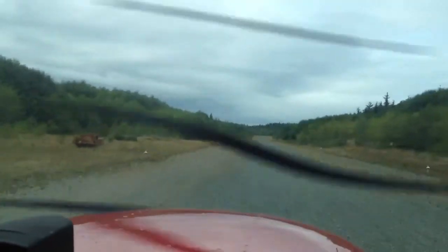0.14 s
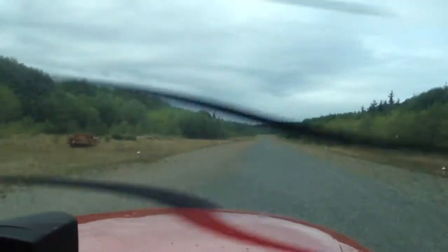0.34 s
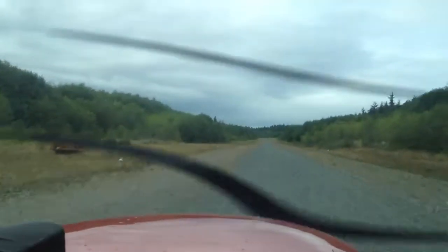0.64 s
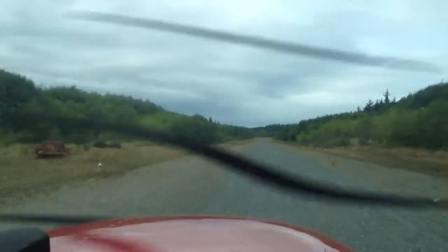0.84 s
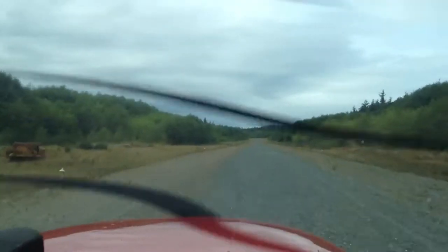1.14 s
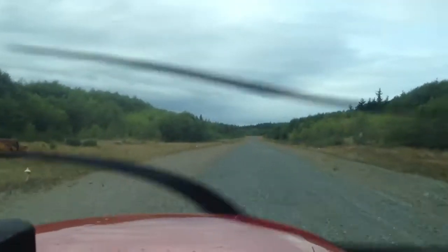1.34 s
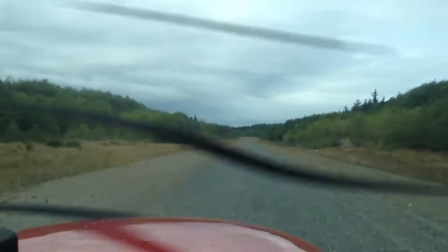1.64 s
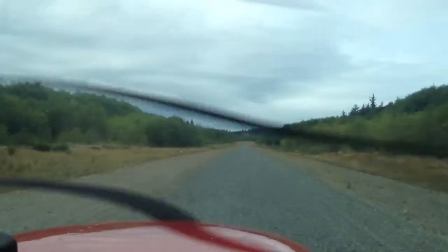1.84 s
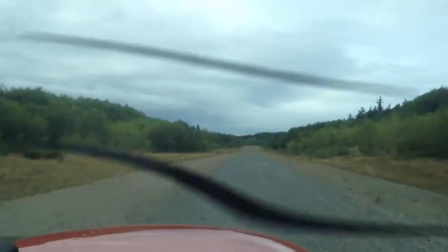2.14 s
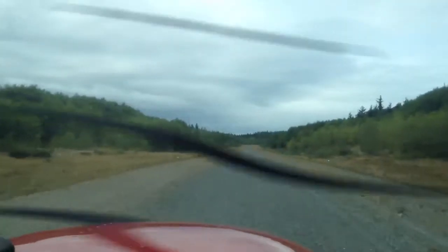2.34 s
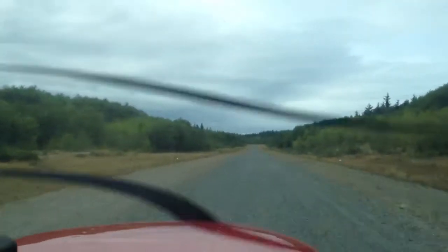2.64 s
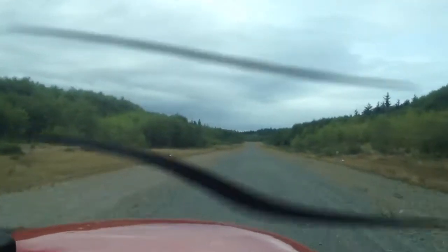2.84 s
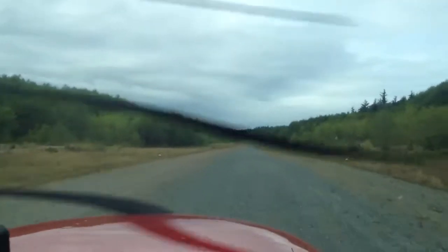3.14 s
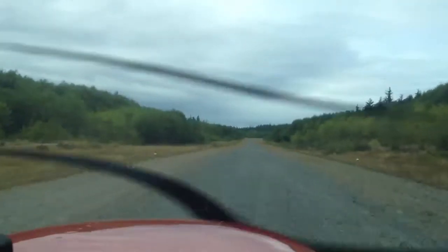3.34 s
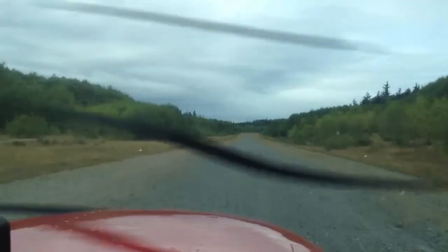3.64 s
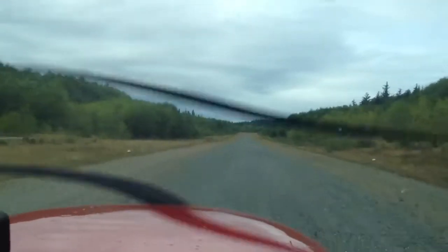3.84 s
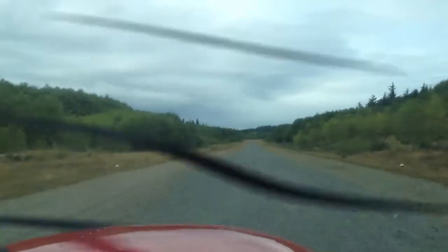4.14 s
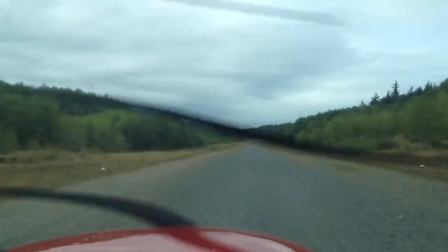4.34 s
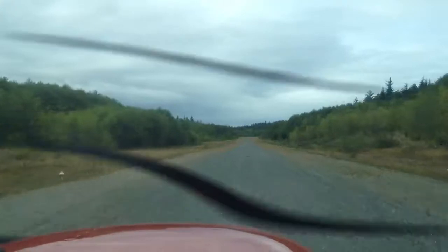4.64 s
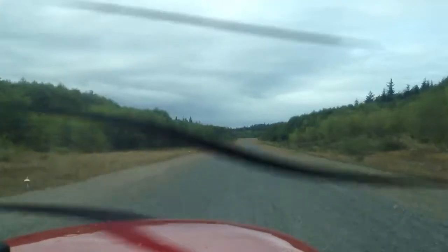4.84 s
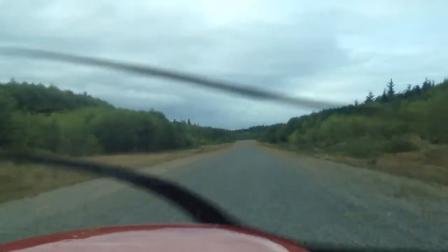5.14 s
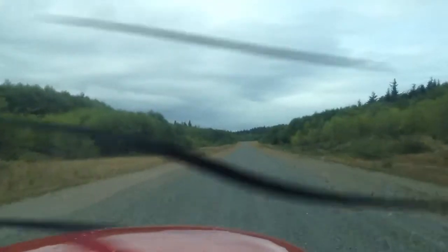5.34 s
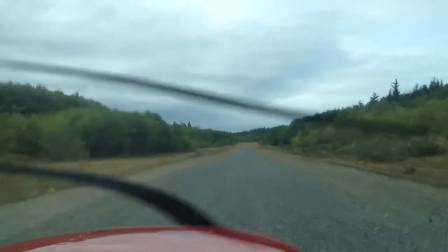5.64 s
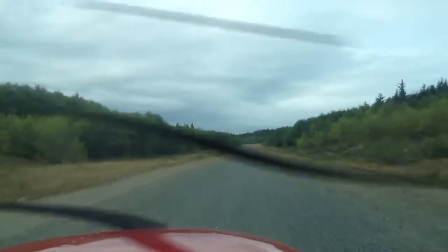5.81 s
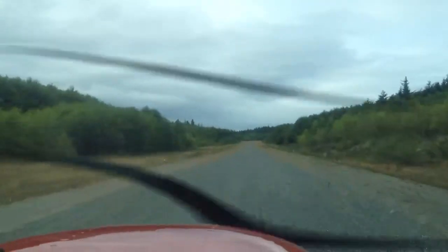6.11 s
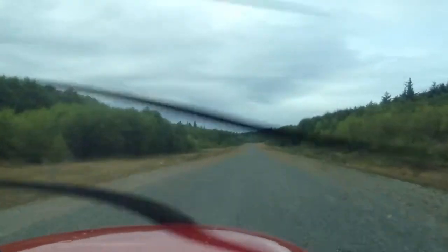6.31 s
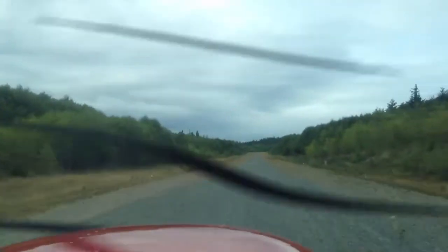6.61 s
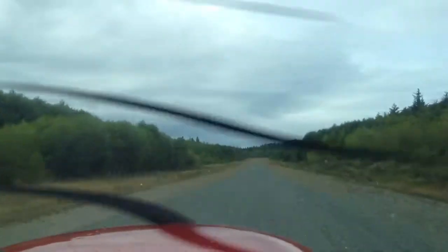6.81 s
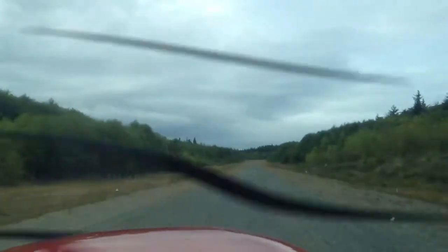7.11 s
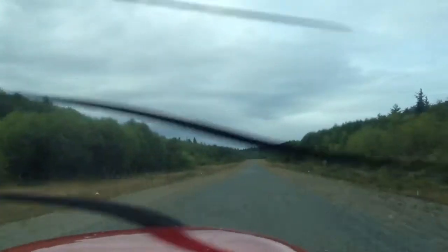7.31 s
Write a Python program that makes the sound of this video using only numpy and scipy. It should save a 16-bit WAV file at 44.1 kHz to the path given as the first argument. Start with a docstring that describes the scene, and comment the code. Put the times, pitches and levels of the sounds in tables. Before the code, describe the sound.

From a microphone in the cabin of a light aircraft, a fast crackling rattle of propeller blades bounces around the small space. It blunts into a hollow puttering and gives way to a fuller exhaust drone, with booming cabin rumble, rushing air and a faint hiss. The engine speed stays even as the plane rolls along the strip, and a few small, bright ticks come late on.

```python
"""Sharp propeller slaps, one a turn, bounce around the cabin of a light piston aircraft.
It is starting its takeoff roll at a steady engine speed. As the blades bite the air, the slaps
soften into a hollow putter. The exhaust drones, the cabin booms, and the air thrown back by the
propeller (the wash) roars on the windscreen and hisses at the seals. Near the end a loose fitting ticks."""
import sys
import numpy as np
from scipy import signal
from scipy.fft import rfft, irfft, next_fast_len
from scipy.io import wavfile
from scipy.ndimage import uniform_filter1d, minimum_filter1d

SR = 44100
rng = np.random.default_rng(int(sys.argv[2]) if len(sys.argv) > 2 else 0)


def to_wav(s):
    """Save 16-bit WAV."""
    ch = np.atleast_2d(s).T  # columns
    pcm = np.round(np.clip(ch, -1, 1) * 32767)  # PCM
    wavfile.write(sys.argv[1], SR, pcm.astype(np.int16))


N = 329427
TIME = np.arange(N) / SR

# How fast the propeller shaft spins: time_s, speed_hz (turns a second)
SHAFT_SPEED = [(0, 40.63), (2, 40.67), (3.5, 40.77), (5.3, 40.8), (6.4, 40.9), (7.47, 40.9)]
# The slap's shape and timing; a longer wave sounds blunter: time_s, half_length_s, late_s, jitter_s
SLAP_WAVE = [(0, 0.00023, 0.00026, 0.00039), (.4, 0.00022, 0.00025, 0.0004), (.55, 0.00028, .0008, 0.00018),
             (1.2, 0.00026, 0.00076, 0.00018), (1.6, 0.00032, .0002, 0.00022),
             (2.1, 0.00034, -0.0011, 0.00022), (2.8, 0.00053, 0.0032, 0.00046)]


def undb(db):
    """Turn decibels into a number to multiply by."""
    return 10 ** (np.asarray(db) / 20)


def curve(table, at=TIME):
    """Join a table's rows with straight lines in time; one curve for each column after the first."""
    times, *columns = np.transpose(table)
    return [np.interp(at, times, column) for column in columns]


def unit(x):
    """Scale a sound to a standard strength (rms 1)."""
    return x / np.std(x)


def colour(x, spectrum):
    """Shape a sound's bass and treble with (pitch_hz, level_db) points, then scale it to rms 1."""
    hz, db = np.transpose(spectrum)
    size = next_fast_len(N + SR // 10)
    bins_hz = np.fft.rfftfreq(size, 1 / SR) + 1
    gain = undb(np.interp(np.log(bins_hz), np.log(hz), db))
    return unit(irfft(rfft(x, size) * gain, size)[:N])


def ring(x, hz, width_hz):
    """Let a sound ring at one pitch; a narrower width rings for longer."""
    return signal.lfilter(*signal.iirpeak(hz, hz / width_hz, fs=SR), x)


def wander(rate_hz):
    """A smooth random wobble, about 1 in size, that heads for a new value rate_hz times a second."""
    step = int(SR / rate_hz)
    held = np.repeat(rng.standard_normal(N // step + 2), step)[rng.integers(step):]
    return 1.34 * uniform_filter1d(uniform_filter1d(held, step), step)[:N]


def noise():
    """White noise: all pitches equally strong."""
    return rng.standard_normal(N)


def seal_hiss(gusts, wash_db):
    """Air hisses at the cabin seals, louder as the thrust builds."""
    # The tone of the hiss: pitch_hz, level_db
    tone = [(2000, -2.5), (3600, 4), (4400, -4), (5500, 1.5), (7200, 2.5), (8600, 4), (9700, 0.5),
            (11500, 0), (14000, -3.5), (15500, -10)]
    # How the hiss rises and falls: time_s, level_db
    levels = [(0, -4), (.5, -2), (1.2, -2), (2.1, 1.5), (3, -1), (7.47, 0.1)]
    hiss = colour(noise(), tone) * (1 + 0.29 * (gusts - 1)) * undb(0.87 * wander(30))
    return hiss * undb(-37 + 0.83 * wash_db + curve(levels)[0])


def cabin_boom(wash_db, lurch_db=0.84, boom_hz=172, width_hz=42):
    """The wash and the wheels shake the cabin air in lurches, most of all at its own natural pitch."""
    # The tone of the low rumble: pitch_hz, level_db
    tone = [(25, -19), (45, -14), (66, -51), (80, -26), (102, -5.5), (140, -5), (180, 2.5), (200, 3),
            (228, -5.5), (330, -7), (480, -20.5), (1000, -47)]
    # The rumble builds as the roll starts and eases as the wings take the weight: time_s, level_db
    levels = [(0, -10.5), (1.2, -2.5), (1.7, -0.5), (2.15, -2.5), (2.5, 0), (3.2, -0.5), (4, -1.5),
              (5.7, 2.5), (6.8, -1.5), (7.47, -1.5)]
    boom = unit(ring(ring(noise(), boom_hz, width_hz), boom_hz, width_hz))
    rumble = colour(noise(), tone) * undb(curve(levels)[0] + lurch_db * wander(6.4))
    return rumble * undb(-19 + 0.77 * wash_db) + boom * undb(-23 + 1.08 * wash_db)


def engine_clatter(turn, low_cut_hz=750):
    """The engine repeats the same rough clatter every two turns, pitched above most of the drone."""
    cycle = rng.standard_normal(2048)
    places = np.arange(len(cycle)) / len(cycle)
    clatter = unit(np.interp(turn / 2, places, cycle, period=1))
    return signal.sosfilt(signal.butter(4, low_cut_hz, "high", fs=SR, output="sos"), clatter)


def wind_roar(turn, gusts, clatter_db=-9, flutter_db=1.0):
    """The wash roars on the windscreen; mixed with engine clatter, it makes windows and trim ring."""
    # The tone of the roar: pitch_hz, level_db
    tone = [(200, -13), (420, 1.5), (490, 1.5), (630, -2), (740, -5.5), (940, -5.5), (1060, -11),
            (1330, -11), (1460, -15), (1800, -16), (2450, -23), (3200, -26), (4200, -46), (8000, -85)]
    # The narrow rings of windows and trim: pitch_hz, width_hz, level_db
    trim_rings = [(645, 30, -8), (1341, 30, -4.5), (1535, 27, -3.5), (1676, 43, -8), (1788, 50, -3.5),
                  (2020, 22, -14), (2165, 32, -2), (2772, 17, 4), (3160, 53, -2), (3440, 65, 3),
                  (3680, 45, -1)]
    # The roar builds with the thrust, then holds: time_s, level_db
    levels = [(0, -25.5), (1.4, -24), (1.7, -21), (2.15, -20.5), (2.36, -17.6), (2.65, -19.4),
              (2.82, -18.6), (3, -20), (3.5, -17.5), (3.65, -20), (4.25, -20.5), (4.48, -17.2),
              (4.66, -17.8), (4.8, -19.8), (5.25, -21.3), (5.5, -20), (5.85, -18.5), (6.2, -18.5),
              (6.9, -20), (7.47, -18)]
    clatter = undb(clatter_db) * engine_clatter(turn)
    rush = (noise() + clatter) * gusts * undb(flutter_db * wander(60))
    trim = sum(undb(db) * ring(rush, hz, width_hz) for hz, width_hz, db in trim_rings)
    return colour(rush + trim, tone) * undb(curve(levels)[0])


def fitting_ticks(rise_s=0.0007, chatter_db=2.5):
    """A loose fitting strikes sharply and chatters for a few thousandths of a second."""
    # Each strike of the fitting: start_s, level_db, decay_s
    strikes = [(6.188, -26, .005), (6.310, -29, .006), (6.369, -24.5, .008), (6.552, -25.5, .006),
               (7.040, -22, 0.0063)]
    # The bright tone of a tick: pitch_hz, level_db
    tone = [(3000, -20), (6000, -7), (11500, -3), (15500, -13)]
    envelope = 0
    for start_s, db, decay_s in strikes:
        age = np.maximum(TIME - start_s, 0)
        envelope += undb(db) * (1 - np.exp(-age / rise_s)) * np.exp(-age / decay_s)
    return envelope * colour(noise() * undb(chatter_db * wander(2500)), tone)


def engine_drone(turn, waver_db=1.8, wobble=0.032):
    """Exhaust and blade tones follow the shaft; uneven firing shakes each one, the lowest least."""
    # The tones that make up the drone: shaft_multiple (of the shaft speed), level_db
    tones = [(2, -16), (3, -12.5), (4, -6.5), (5, -16.5), (6, -8.5), (7, -17.5), (7.5, -14), (8, -14),
             (8.5, -17.5), (9, -19), (10, -26), (10.5, -14.5), (11, -15.5), (12, -19), (12.5, -19.5),
             (13, -14.5), (14, -19), (15, -17), (15.5, -18.5), (21, -24)]
    # The drone firms up as the aircraft gathers speed: time_s, level_db
    levels = [(0, -32.5), (1.3, -37), (2, -25), (2.7, -17), (3.6, -19.5), (4.5, -14.5), (5.2, -17),
              (5.8, -18), (6.3, -18), (6.9, -17.5), (7.47, -17)]
    # Tones that sing out for a while: shaft_multiple, peak_s, spread_s, level_db
    swells = [(4, .65, 0.23, -31.5), (6, 2.3, 0.7, -28), (12, 2.05, .2, -31), (4, 1.85, 0.17, -31),
              (6, 1.96, 0.24, -32), (10, 2.7, 0.31, -25), (10, 4.1, 0.86, -28.5), (3, 4.03, 1.46, -25),
              (8, 3.26, 0.17, -27.5), (12, 3.6, 0.22, -30), (7.5, 4.72, 0.22, -26), (14, 5.2, 0.45, -27),
              (13, 6.4, 0.44, -26.5), (11, 5.78, 0.39, -27.5), (6, 5.6, .6, -28), (15, 6.01, 0.27, -25.5),
              (15, 6.94, 0.41, -29), (4, 6.67, 0.3, -19.5), (2, 6.9, 1.2, -31), (8, 7.5, 1.05, -23.5),
              (6, 7.55, 0.3, -21.5), (10.5, 7.4, 0.47, -25)]
    drone_db, = curve(levels)
    drone = 0
    for multiple, db in tones:
        swell = sum(undb(peak_db) * np.exp(-((TIME - peak_s) / spread_s) ** 2 / 2)
                    for which, peak_s, spread_s, peak_db in swells if which == multiple)
        shake = min(multiple / 4, 1) ** 2
        phase = 2 * np.pi * (multiple * turn + rng.random()) + multiple * wobble * wander(12)
        size = np.hypot(undb(drone_db + db), swell) * undb(shake * waver_db * wander(5))
        drone += size * np.sqrt(2) * np.sin(phase)
    return drone


def lull_db(at):
    """Slack air lets slap and putter fall away briefly; gives the change in dB at each time."""
    # Short dips, and one small lift: middle_s, length_s, change_db
    lulls = [(.056, .025, -3), (.585, .05, -7), (1.225, .05, -2), (1.311, .025, -21), (1.46, .025, -17),
             (1.545, .05, -2), (1.853, .025, 2.5), (2.05, .025, -14)]
    return sum(db * (np.abs(at - middle_s) < length_s / 2) for middle_s, length_s, db in lulls)


def hollow_putter(turn, shaft_hz, rise_s=0.0018, decay_s=0.0067, uneven_db=2.4, detune=0.018,
                  upper_hz=890, upper_peak_s=0.0026, middle_hz=660, middle_db=-13, deep_hz=250):
    """Each blunt slap thumps four hollow rings out of the cabin; the upper one swells and soon stops."""
    # The putter, with two rings set against its main one: time_s, level_db, pitch_hz, upper_db, deep_db
    thumps = [(0, -32, 462, -8, -16), (.6, -31.8, 476, 1.5, -11), (1.3, -28.5, 483, 3, -9),
              (1.52, -22.8, 466, -5, -5), (1.83, -22, 458, -10, -5.5), (2.15, -25, 458, -12, 0),
              (2.45, -20.5, 435, -8, -2), (2.8, -30.5, 412, -5, -14.5), (4.5, -31.5, 426, -2, -4)]
    db, main_hz, upper_db, deep_db = curve(thumps)
    age = turn % 1 / shaft_hz
    envelope = (1 - np.exp(-age / rise_s)) * np.exp(-age / decay_s) * (1 - (turn % 1) ** 2)
    short = envelope * np.exp(-age / decay_s)  # the middle and deep rings die twice as fast
    angle = 2 * np.pi * age * (1 + detune * wander(40))
    main = unit(-np.sin(main_hz * angle) * envelope)
    upper = unit(-np.sin(upper_hz * angle) * age * np.exp(-(age / upper_peak_s) ** 2 / 2))
    middle = unit(-np.sin(middle_hz * angle) * short)
    deep = unit(np.sin(deep_hz * angle) * short)
    rings = main + undb(upper_db) * upper + undb(middle_db) * middle + undb(deep_db) * deep
    return rings * undb(db + uneven_db * wander(40) + lull_db(TIME - age))


def slap_strength(at, uneven_db=1.4):
    """How hard a slap hits, in dB: uneven from turn to turn, weak in a lull, hard at a crack."""
    # The ordinary slap fades as the blades bite: time_s, strength_db
    strengths = [(0, -8), (.35, -13), (.55, -10), (.7, -15.5), (1.08, -13), (1.3, -16.5), (1.7, -14.5),
                 (2, -16), (2.3, -28)]
    # Hard cracks, where a blade cuts through a swirl of air: time_s, strength_db
    cracks = [(.007, -2), (.031, -4), (.082, -8), (.106, -3), (.130, -5), (.155, -5), (.178, -4.5),
              (.203, -9), (.327, -10), (.376, -13), (.401, -10), (.426, -4.5), (.451, -3.5), (.5, -8),
              (.524, -8), (.623, -11), (.647, -7), (.746, -1), (.770, -3), (.820, -4.5), (.844, -4.5),
              (.869, -10), (.918, -11), (.967, -7), (1.016, -8), (1.041, -13), (1.114, -6), (1.139, -6.5),
              (1.164, -4.5), (1.189, -11), (1.262, -6)]
    db = curve(strengths, at)[0] + uneven_db * wander(80) + lull_db(at)
    half_turn_s = 0.5 / SHAFT_SPEED[0][1]
    for time_s, crack_db in cracks:
        db = np.where(np.abs(at - time_s) < half_turn_s, crack_db, db)
    return db


def cabin_echoes(wave, trip_s=0.00229, bounce=0.4, dull_hz=1700):
    """A slap rings the panels and bounces across the cabin twice, weaker and duller each time."""
    # The rings of the cabin panels: pitch_hz, width_hz, level_db
    panel_rings = [(167, 62, 4.5), (270, 114, 2.5), (726, 370, -3), (833, 62, -4.5), (930, 77, -2),
                   (1328, 69, 4), (1557, 46, 10), (1830, 90, 9)]
    panels = sum(undb(db) * ring(wave, hz, width_hz) for hz, width_hz, db in panel_rings)
    echo, echoes = wave, 0
    for _ in range(2):
        delayed = np.pad(echo, (int(trip_s * SR), 0))[:N]
        echo = bounce * signal.lfilter(*signal.butter(1, dull_hz, fs=SR), delayed)
        echoes += echo
    return panels + echoes


def blade_slaps(turn, shaft_hz, crack_hz=3200, crack_s=0.00013,
                tail_db=-14, tail_s=0.0019, tail_hz=1200, tail_width_hz=700):
    """Once a turn a blade throws a pressure wave into the cabin: a quick push, then a pull."""
    age = (turn - np.round(turn)) / shaft_hz  # seconds from the nearest slap, negative before it
    strength_db = slap_strength(TIME - age)
    size = undb(strength_db + 6)
    half_length_s = curve(SLAP_WAVE)[0] * np.exp(0.054 * wander(40.26))
    position = age / half_length_s
    wave = -position * np.exp(-position ** 2 / 2) * size
    # A strong wave steepens into a shock, so its bright crack gains 2 dB for each 1 dB of slap.
    front = age * np.exp(0.12 * wander(40.4))  # some shock fronts are steeper than others
    crack_envelope = np.exp(-(front / crack_s) ** 2 / 2) * undb(2 * strength_db)
    crack = -np.sin(2 * np.pi * crack_hz * front) * crack_envelope
    # Seats and struts scatter the wave into a short, noisy tail.
    burst = noise() * (age > 0) * np.exp(-np.abs(age) / tail_s) * size
    burst *= np.sqrt(SR / 2 / tail_width_hz)  # makes up for what the narrow rings take away
    tail = ring(ring(burst, tail_hz, tail_width_hz), tail_hz, 2 * tail_width_hz)
    return wave + crack + tail * undb(tail_db) + cabin_echoes(wave)


def scene(first_slap_s=0.0066, buffet_db=0.5, slap_low_cut_hz=95):
    """One shaft times the slaps, the drone and the gusts; the buffeting wash drives boom and hiss."""
    # How hard the wash hits the cabin, about 0 dB at full thrust: time_s, level_db
    wash_levels = [(0, -5.5), (1.42, -6.5), (1.84, -0.6), (2.1, -4.5), (2.3, 1.5), (2.6, 1), (2.85, 2.1),
                   (2.97, 0), (3.5, 3), (3.63, 0), (4.0, 0), (4.26, -0.5), (4.48, 3), (4.63, 2.5),
                   (4.78, 0), (5.27, -1.5), (5.95, 1), (6.75, 0.0), (7.46, 0)]
    shaft_hz, = curve(SHAFT_SPEED)
    turn = np.cumsum(shaft_hz) / SR - first_slap_s * shaft_hz[0] + 0.0028 * wander(20)  # turns so far
    # In swirling air the blade slaps a little earlier or later on every turn.
    _, late_s, jitter_s = curve(SLAP_WAVE)
    slap_turn = turn - shaft_hz * (late_s + jitter_s * wander(60))
    wash_db = curve(wash_levels)[0] + buffet_db * wander(12)
    gusts = 1 + 0.014 * np.sin(2 * np.pi * turn) + 0.045 * np.sin(2 * np.pi * 2 * turn)
    propeller = blade_slaps(slap_turn, shaft_hz) + hollow_putter(slap_turn, shaft_hz)
    # Short slaps carry little bass.
    propeller = signal.lfilter(*signal.butter(1, slap_low_cut_hz, "high", fs=SR), propeller)
    cabin = propeller + engine_drone(turn) + cabin_boom(wash_db)
    cabin += wind_roar(turn, gusts) + seal_hiss(gusts, wash_db) + fitting_ticks()
    return cabin[None]


def record(dry, ceiling=0.76, low_cut_hz=68, high_cut_hz=15500):
    """The microphone drops the deepest bass; a fast limiter turns peaks down; the top treble is cut."""
    heard = signal.sosfilt(signal.butter(4, low_cut_hz, "high", fs=SR, output="sos"), dry)
    gain = ceiling / np.maximum(np.abs(heard), ceiling)
    gain = uniform_filter1d(minimum_filter1d(gain, size=90), size=90)  # held and smoothed over 2 ms
    return signal.sosfilt(signal.ellip(14, 0.2, 80, high_cut_hz, fs=SR, output="sos"), heard * gain)


dry = scene()
out = record(dry)
to_wav(out)
```